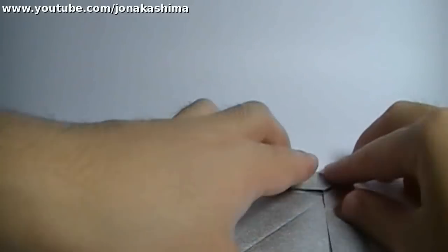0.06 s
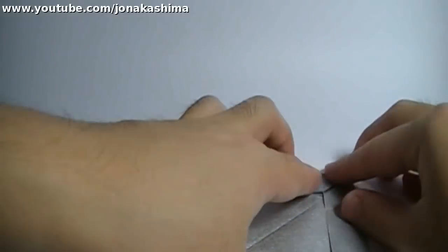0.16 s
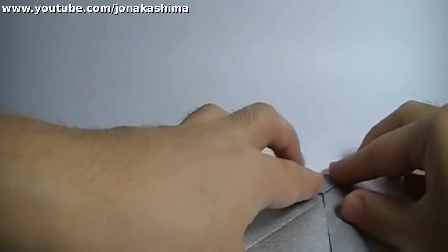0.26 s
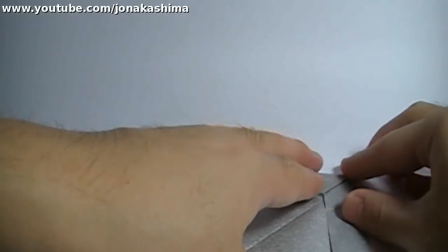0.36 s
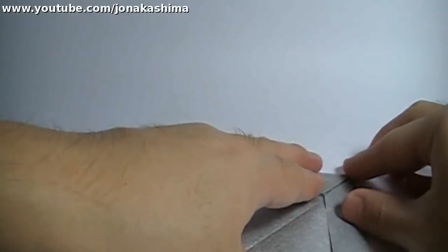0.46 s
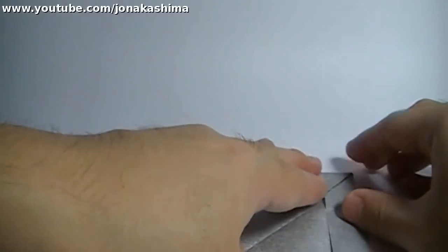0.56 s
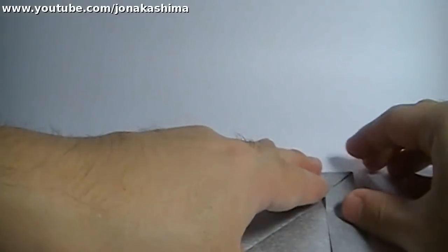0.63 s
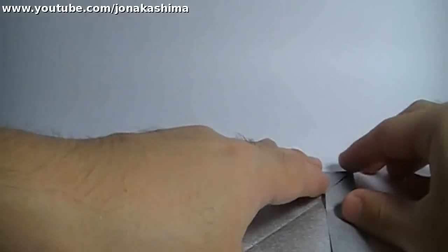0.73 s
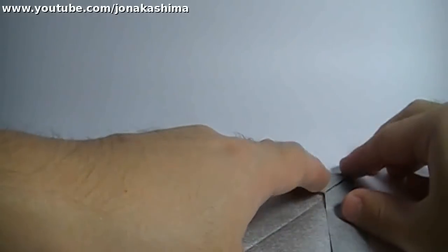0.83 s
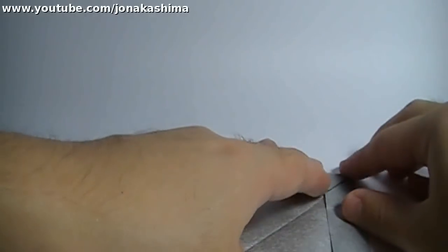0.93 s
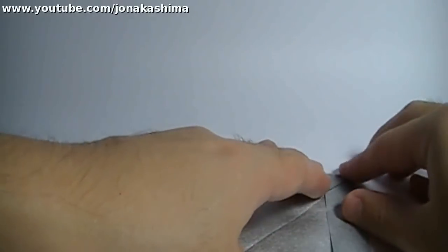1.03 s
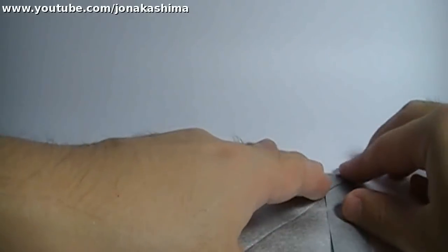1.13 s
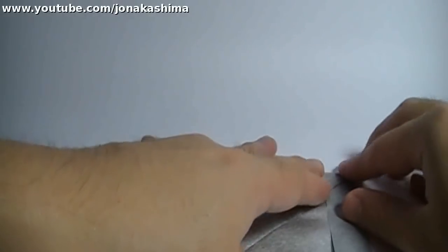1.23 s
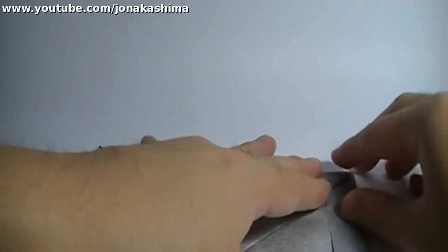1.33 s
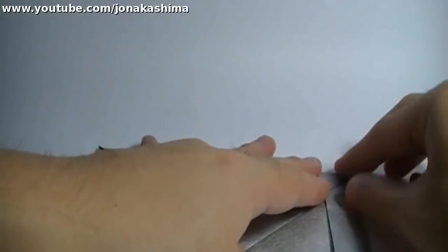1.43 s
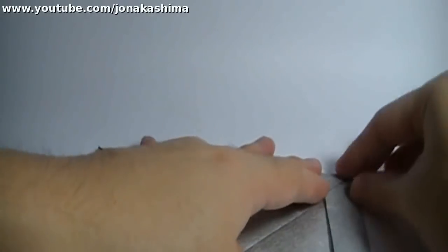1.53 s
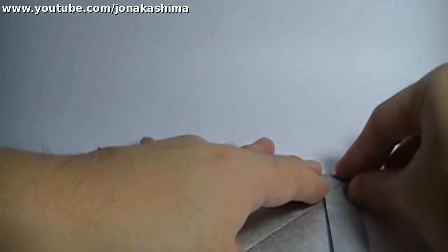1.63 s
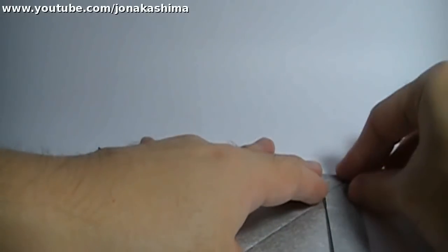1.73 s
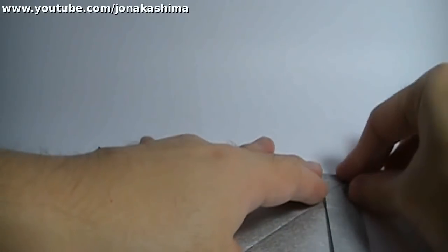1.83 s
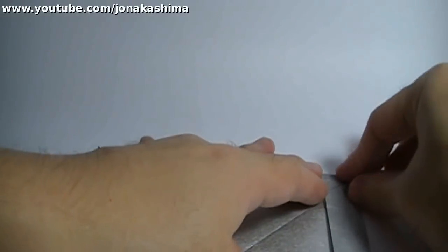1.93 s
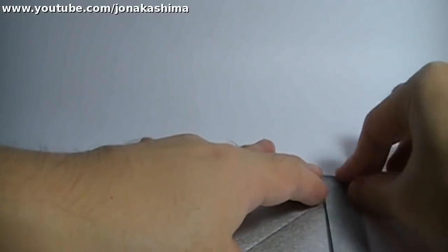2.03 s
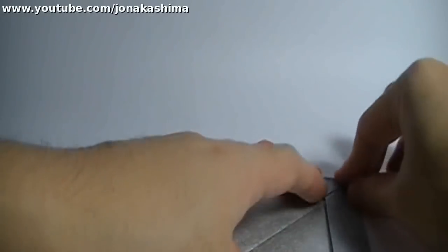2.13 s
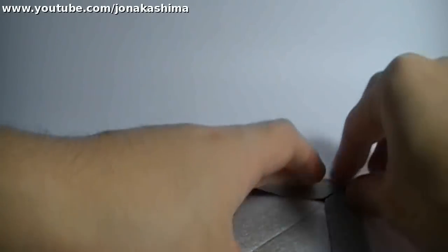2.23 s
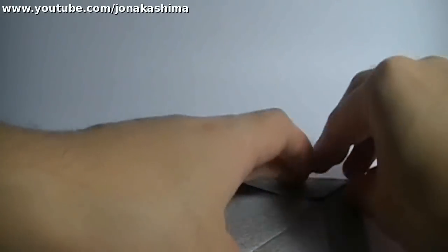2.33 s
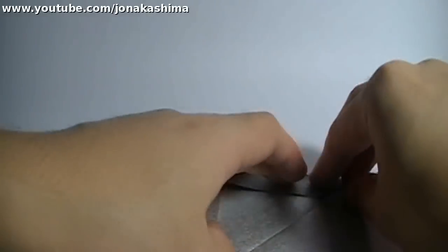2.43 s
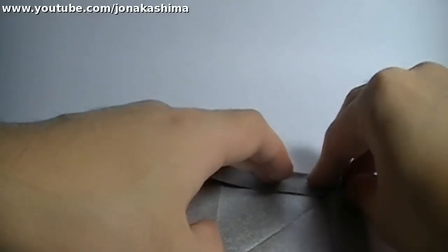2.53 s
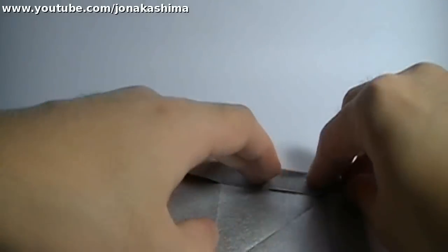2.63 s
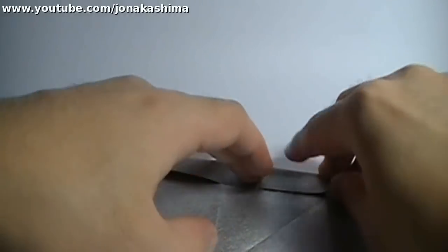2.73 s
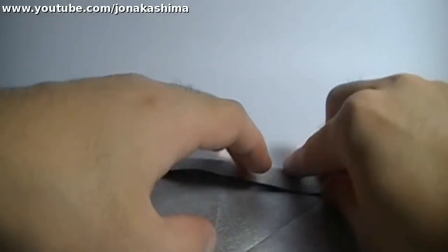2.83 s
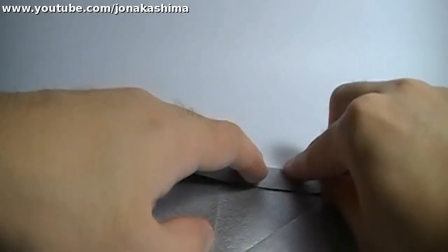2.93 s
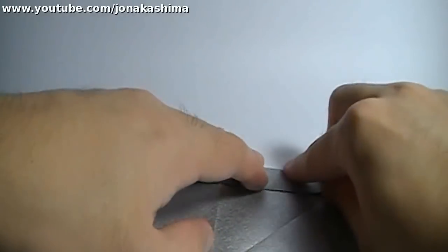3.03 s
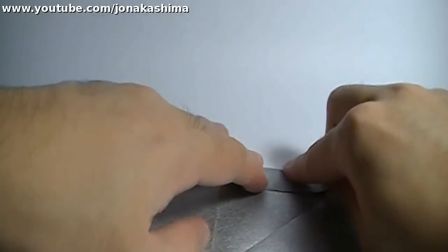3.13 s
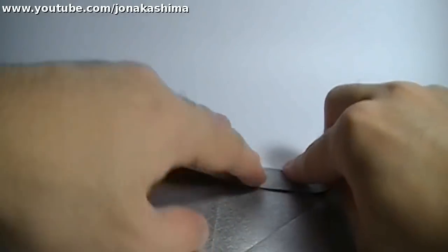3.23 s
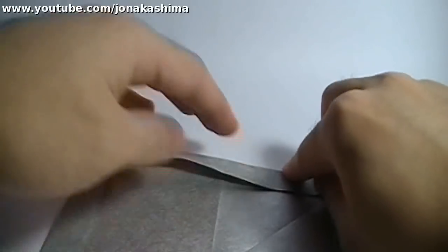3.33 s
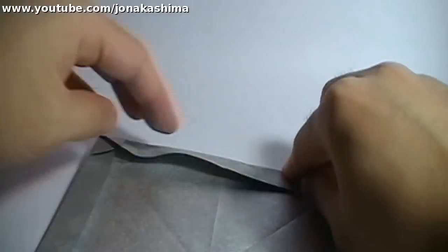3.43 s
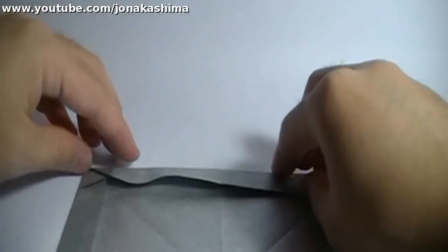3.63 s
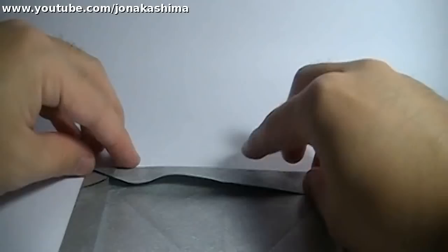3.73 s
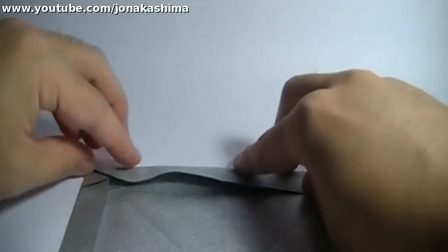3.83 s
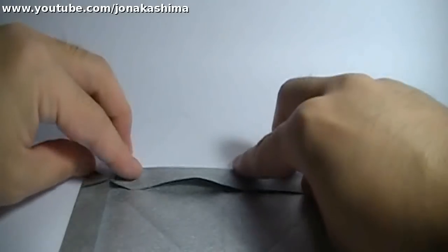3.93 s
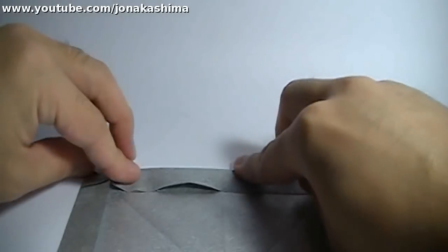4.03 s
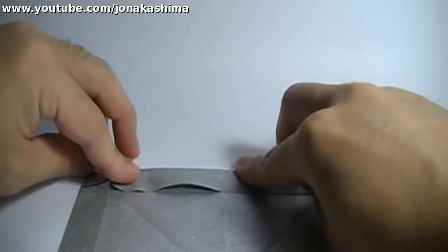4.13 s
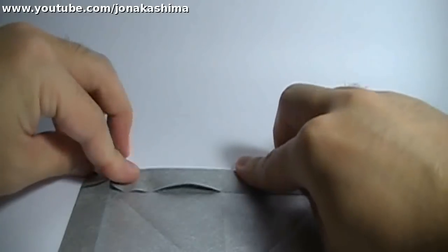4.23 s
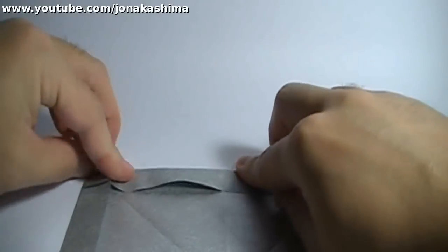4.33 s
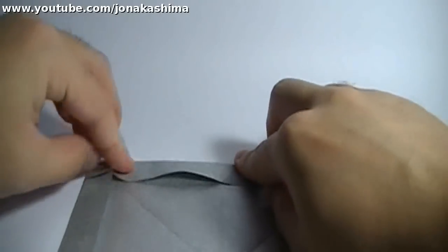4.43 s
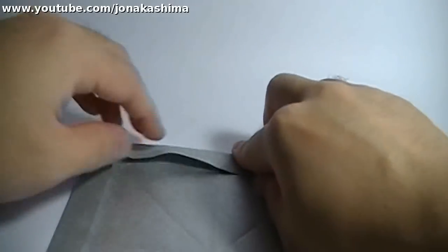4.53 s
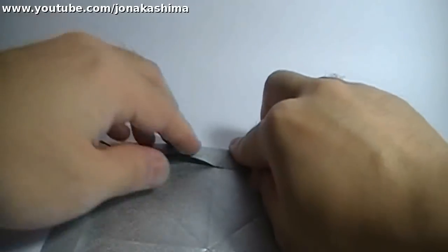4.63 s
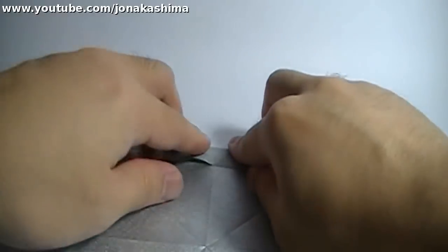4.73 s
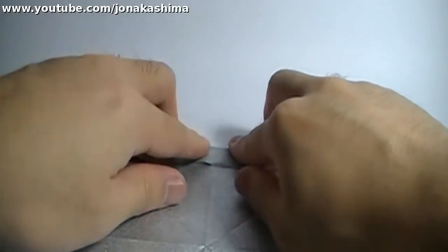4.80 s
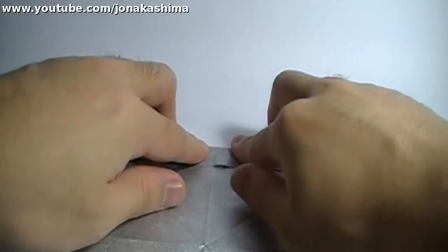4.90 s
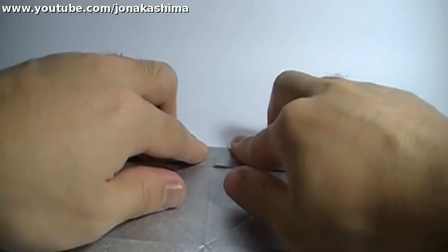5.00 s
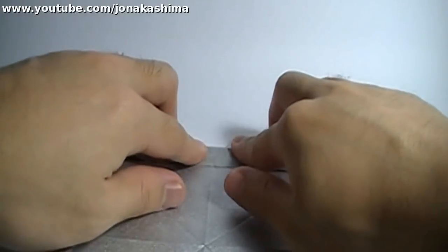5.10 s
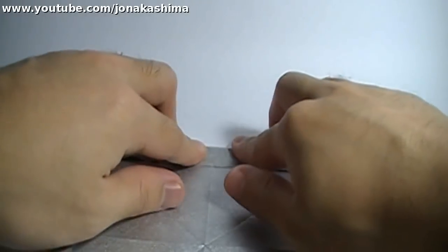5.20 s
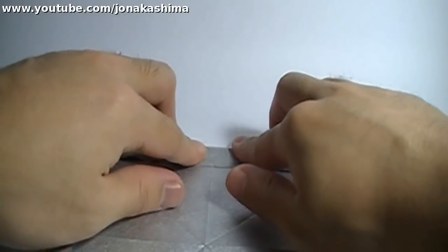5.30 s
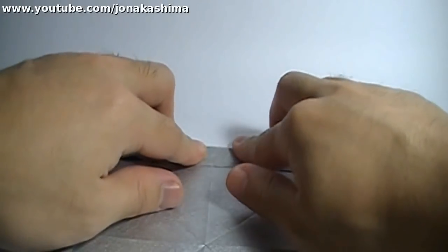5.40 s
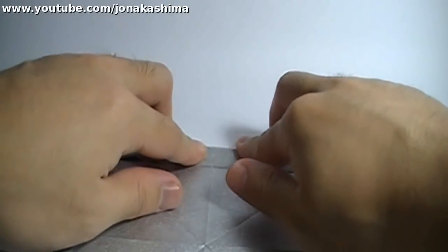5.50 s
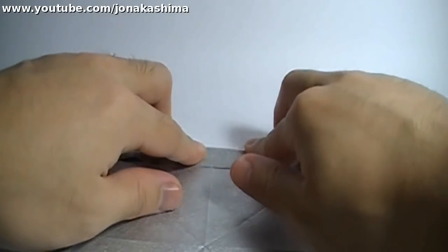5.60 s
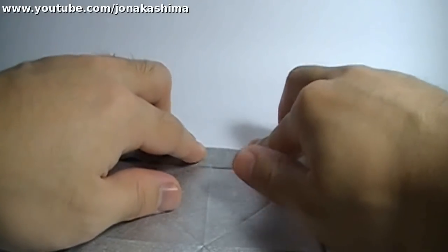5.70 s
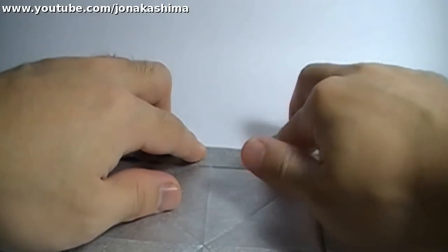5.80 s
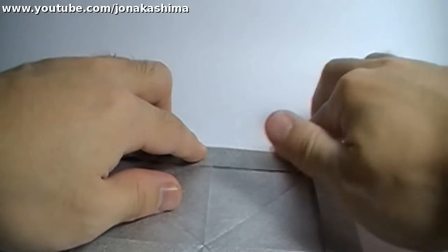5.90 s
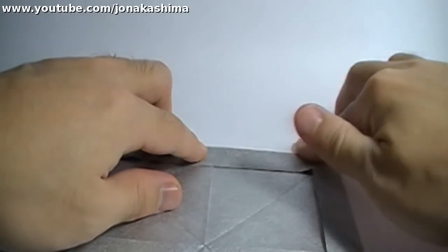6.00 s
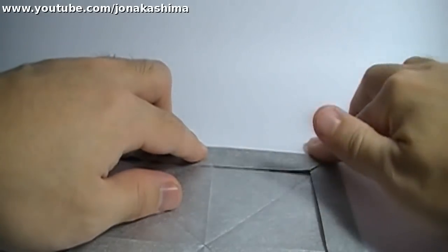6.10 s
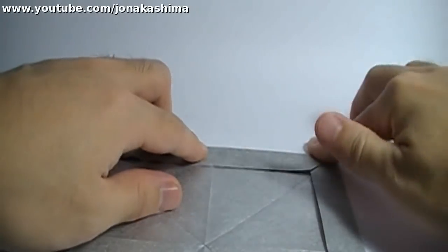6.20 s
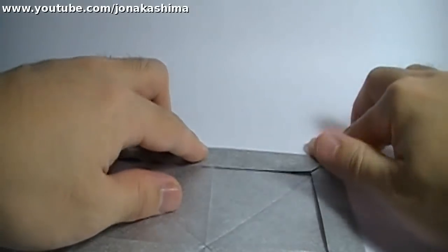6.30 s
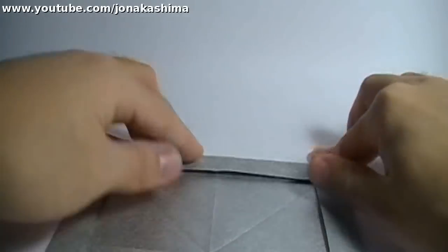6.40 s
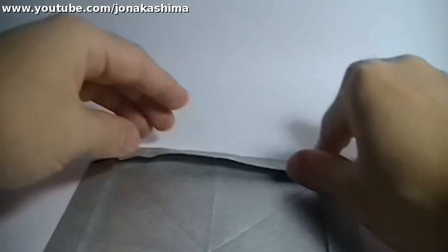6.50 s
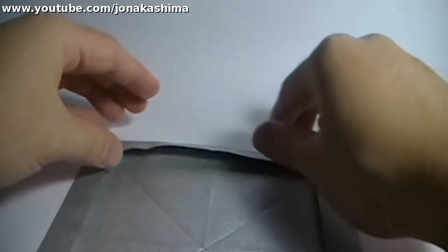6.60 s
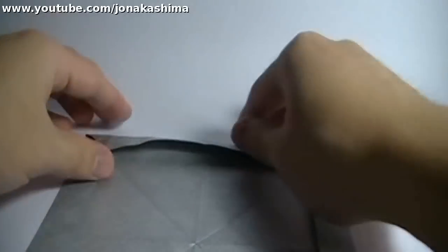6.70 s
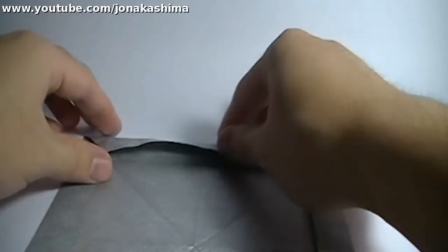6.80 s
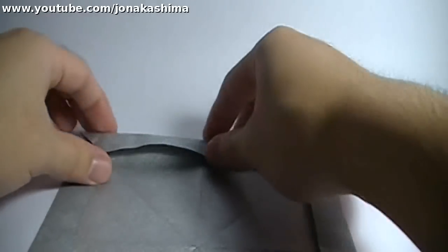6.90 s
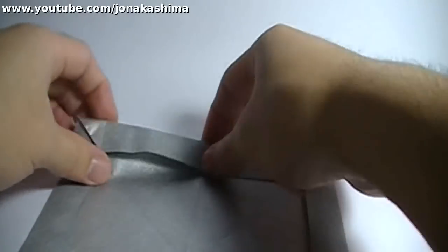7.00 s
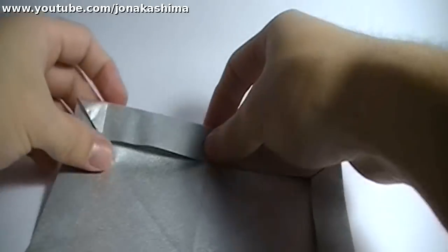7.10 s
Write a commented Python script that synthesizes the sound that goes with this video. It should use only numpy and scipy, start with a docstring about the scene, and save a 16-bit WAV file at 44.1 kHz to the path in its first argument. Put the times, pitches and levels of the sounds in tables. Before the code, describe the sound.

Close, quiet rustling of foil paper being creased by fingers, with scattered crackles, dull table taps and a loud crack near the end.

```python
"""Foil paper is folded by two hands on a table in a small room, close to a stereo microphone.
Short rubbing strokes and one long sweep are coloured noise of tiny slips, brighter when faster.
The foil buckles in sharp snaps and small crinkles: noise cracks with ragged flutters.
Fingertips land with soft low thumps, and knocks ring the table top as decaying sines.
A short room tail follows; a faint hum and steady hiss lie in the background."""
import sys
import numpy as np
from scipy import signal
from scipy.fft import rfft, irfft, next_fast_len
from scipy.io import wavfile

SR = 44100
rng = np.random.default_rng(int(sys.argv[2]) if len(sys.argv) > 2 else 0)


def wav_record(signal):
    """Record a signal, one row per channel, as 16-bit PCM in the file named by sys.argv[1]."""
    frames = np.transpose(np.atleast_2d(signal))
    bounded = np.clip(frames, -1, 1)
    # unit amplitude maps onto the largest positive 16-bit level
    quanta = np.round(bounded * 32767).astype(np.int16)
    wavfile.write(sys.argv[1], SR, quanta)


N = 315315
TIME = np.arange(N) / SR

# shorter rubbing strokes; sharpness is low for a flat finger pad, high for a nail on the edge:
# (start [s], rise [s], fall [s], hiss drive at the crest [dB], contact sharpness [dB])
RUBBING_STROKES = [(0.0, 0.01, 0.13, -49, 4), (.204, 0.077, 0.009, -42, 3.5), (.309, 0.013, 0.071, -46, 6),
                   (0.481, 0.029, 0.038, -47, 0.5), (0.624, 0.0036, 0.0082, -50.5, 0),
                   (1.385, 0.013, 0.021, -49.5, 8.5), (1.528, 0.019, 0.028, -52.5, -14),
                   (1.972, 0.019, 0.019, -54.5, -17), (2.193, 0.015, 0.043, -54.5, -17),
                   (2.249, 0.0049, 0.0095, -31, 2.5), (2.328, 0.18, 0.045, -46.5, -3),
                   (2.558, 0.13, 0.11, -46.5, -1.5), (2.824, 0.026, 0.012, -37.5, -1.5),
                   (3.201, 0.0079, 0.0045, -49, -3), (3.241, 0.0045, 0.033, -43, 7),
                   (3.448, 0.027, 0.034, -36.5, 3), (3.555, 0.063, 0.016, -29.5, 9),
                   (3.675, 0.053, 0.0075, -40, -4), (3.749, 0.028, 0.065, -56.5, -23),
                   (3.918, 0.033, 0.043, -52.5, -12), (4.76, 0.017, 0.047, -48, 1),
                   (4.865, 0.015, 0.1, -55, -7), (5.438, .005, .012, -57, -5),
                   (5.491, 0.079, 0.062, -54.5, 5.5), (5.651, 0.0068, 0.042, -46.5, 15),
                   (5.717, 0.0072, 0.052, -46, 3), (5.828, 0.11, 0.17, -45.5, 3),
                   (6.338, 0.075, 0.016, -48, 3), (6.44, 0.078, 0.025, -48, 3),
                   (6.673, 0.03, 0.021, -37, 1.5), (6.731, .11, 0.079, -43.5, -1.5),
                   (6.898, 0.089, 0.015, -38.5, -1), (7.029, 0.02, 0.12, -42.5, -8)]
# the long sweep along the fold, its speed given as hiss drive: (time [s], level [dB])
FOLD_SWEEP = [(4.08, -68), (4.092, -67), (4.28, -52.5), (4.288, -46.5), (4.354, -48), (4.368, -32.5),
              (4.472, -26), (4.614, -42.5), (4.622, -36.5), (4.76, -59.5)]
# the foil buckles; brightness is the step from one part of the sheet to the next smaller:
# (time [s], level [dB], brightness [dB], share of energy in the first crack [0-1])
FOIL_SNAPS = [(.0945, -48.5, -26, 0.07), (.1413, -43, 6, 0.33), (.7485, -31, 13, 0.1),
              (1.0209, -44, -6.5, 0.25), (1.1827, -44, -4.5, 0), (1.1885, -43.5, -8.5, 0.64),
              (1.2918, -46, 9.5, 0.3), (1.4378, -39, 9.5, 0.4), (1.5359, -43.5, 7, 0.7),
              (1.9768, -45, 4.5, 0.6), (2.1077, -51, -1, .15), (2.412, -34.5, 7, 0.07),
              (2.7072, -34.5, 29, 0.33), (2.7866, -45, -7, 0.02), (2.9281, -40.5, 4, 0.14),
              (3.1076, -32.5, 3.5, 0.08), (3.2435, -37, 2.5, 0.37), (3.454, -47, 10, .75),
              (3.4932, -38.5, 6, 0.08), (3.6249, -35, 0, 0.5), (3.9192, -42.5, 3.5, 0.1),
              (3.9527, -38.5, 5, 0.04), (3.9775, -44, 12, .02), (4.034, -48.5, 13, 0.2),
              (4.2886, -38, 4, 0.3), (4.702, -45.5, -4, 0), (4.8263, -28, 1.5, 0.28),
              (4.8744, -39, 2.5, 0.2), (5.4913, -42.5, 1.5, 0.02), (5.6546, -37.5, 3, 0.04),
              (6.3861, -32, 8.5, 0.03), (6.4493, -37.5, 4, 0.04), (6.4949, -43, -1.5, 0.08),
              (6.9179, -35, -8, 0.18), (6.99, -19, 7, 0.88), (7.0532, -32, 5, 0.7),
              (7.1275, -34.5, -3, 0.6)]
# resonances of the sheet, a negative boost being a dip: (frequency [Hz], width [Hz], boost [dB])
SHEET_RESONANCES = [(785, 60, 1.5), (1271, 16, 6.5), (1810, 460, 2), (4760, 210, 2.5), (7220, 890, -2)]
# how much the resting fingers shift, less while the fold is held down: (time [s], share [0-1])
FINGER_UNREST = [(5.0, 0.83), (5.12, .6), (5.42, 0.48), (5.5, 0.92)]
# firm presses of a fingertip on the table: (time [s], level of the push [dB])
FINGER_PRESSES = [(.072, -48), (1.548, -48.5), (1.973, -50.5), (2.523, -50.5), (2.707, -51), (3.099, -48.5),
                  (4.287, -46.5), (4.357, -44), (4.825, -46.5), (4.9, -50), (5.491, -41.5), (5.653, -46.5),
                  (5.722, -46.5), (5.823, -49.5), (6.384, -42.5), (6.821, -48.5)]
# touches that ring the table top: (time [s], drive level [dB], contact hardness [Hz])
TABLE_KNOCKS = [(.002, -53.5, 570), (0.494, -45, 450), (.749, -43, 730), (1.19, -44, 800),
                (2.786, -43, 616), (3.107, -51, 695), (3.494, -47.5, 604), (4.289, -44, 760),
                (4.962, -48, 550), (5.723, -49.5, 545), (6.083, -47, 683), (6.496, -46, 656)]
# modes of the table top before the hands damp it: (frequency [Hz], relative level [dB], t60 [s])
TABLE_TOP_MODES = [(431, -2, 0.27), (538.4, 3.5, 0.2), (678, 6, 0.13), (837, 9.5, 0.03), (1070, -20, .07)]
# spectra of foil hiss, sheet rustle, hand rumble and background: (frequency [Hz], relative level [dB])
FOIL_HISS_SPECTRUM = [(1200, -38.5), (2500, -12.5), (4000, -5.5), (5500, -3), (7000, 3), (8500, 1),
                      (10000, -10), (12500, -51), (15500, -47)]
SHEET_RUSTLE_SPECTRUM = [(120, -33), (300, -16.5), (550, 0), (900, -1.5), (1600, 0.5), (2400, 0.5),
                         (4000, -6), (8000, -44)]
HAND_RUMBLE_SPECTRUM = [(25, 0), (70, -18), (170, 13.5), (250, -17), (430, -1), (900, -27.5)]
BACKGROUND_SPECTRUM = [(25, -18), (60, -10.5), (105, -4), (220, -14.5), (450, -19.5), (1000, -20),
                       (4000, -26), (8000, -41.5), (13500, -28), (15000, -51)]
# stereo width of the table scene and of the background: (frequency [Hz], side re mid [dB])
TABLE_WIDTH = [(60, -33), (300, -17), (700, -13), (1300, -15), (2400, -31), (4400, -25), (6500, -19),
               (8200, -5.5), (15000, -2.5)]
BACKGROUND_WIDTH = [(60, -9.5), (300, 12.5), (1000, 7), (12000, -3.5)]

SWELL_DB, FADE_DB = 7, 8   # a stroke starts and ends this far under its crest
# a faster rub is brighter: drive at the usual speed, and dB gained for each dB of hiss
USUAL_HISS_DB = -41.5
RUSTLE_DB, RUSTLE_GROWTH = -52, 0.72
SIZZLE_DB, SIZZLE_GROWTH = -58, 1
RUSTLE_LOSS = 0.36   # dB of rustle lost for each dB of sharpness
FLAP_DB = -1.5   # the folded flap, re the dB mean of whole sheet and foil skin
SNAP_SPAN_S = 0.01   # span over which the rms of a snap is set
# every short stroke begins with a fingertip landing softly
LANDING_DB, LANDING_LAG_S = -57.5, 0.00602
FLOOR_DB = -62.5   # background hiss, rms of the mid
HUM_HZ, HUM_DB = 101.5, -72.5   # HUM_DB is the rms about which the hum wavers
CUTOFF_HZ = 15900


def from_db(db):
    """Decibels to gain."""
    return 10 ** (np.asarray(db) / 20)


def rms_one(x):
    """Scale to rms 1."""
    return x / np.sqrt(np.mean(x ** 2) + 1e-20)


def energy_one(x):
    """Scale to a total energy of 1."""
    return x / np.sqrt(np.sum(x ** 2) + 1e-20)


def add(track, s, sound):
    """Mix a short sound into a track at s seconds."""
    at = int(np.clip(round(s * SR), 0, N - 1))
    track[at:at + len(sound)] += sound[:N - at]


def colour(x, points):
    """Filter a sound by a curve of (frequency [Hz], level [dB]) points."""
    hz, level_db = np.transpose(points)
    size = next_fast_len(len(x))
    bins = np.maximum(np.fft.rfftfreq(size, 1 / SR), 1)
    gain = from_db(np.interp(np.log(bins), np.log(hz), level_db))
    return irfft(rfft(x, size) * gain, size)[:len(x)]


def band(x, low_hz, high_hz, order=2):
    """Causal band-pass."""
    edges = [low_hz, min(high_hz, SR / 2 - 1)]
    return signal.sosfilt(signal.butter(order, edges, "band", fs=SR, output="sos"), x)


def drift(rate):
    """A random wander of rms 1, joined by straight lines between `rate` new values a second."""
    knots = rng.standard_normal(N // 20)
    return rms_one(np.interp(TIME * rate, np.arange(len(knots)), knots))


def dying_noise(decay_s, size=4096):
    """A burst of noise that falls by 1/e in decay_s."""
    return rng.standard_normal(size) * np.exp(-TIME[:size] / decay_s)


def stroke_speed(grip_s=0.0016, release_s=0.0053):
    """Strokes grip, swell to a crest and let go, beside the sweep: hiss drive, and sharpness in dB."""
    sweep_s, sweep_db = np.transpose(FOLD_SWEEP)
    sweeping = (TIME > sweep_s[0]) & (TIME < sweep_s[-1])
    speed = from_db(np.interp(TIME, sweep_s, sweep_db)) * sweeping
    weighted_sharpness = np.zeros(N)
    t = TIME[:SR]
    for start, rise_s, fall_s, crest_db, sharp_db in RUBBING_STROKES:
        marks = np.cumsum([0, abs(rise_s), abs(fall_s)])
        grip = np.clip(t / grip_s, 0, 1)
        release = np.exp(-np.clip((t - marks[-1]) / release_s, 0, 20))
        under_crest_db = np.interp(t, marks, [SWELL_DB, 0, FADE_DB])
        stroke = grip * release * from_db(crest_db - under_crest_db)
        add(speed, start, stroke)
        add(weighted_sharpness, start, stroke * sharp_db)
    return speed, weighted_sharpness / (speed + 1e-9)


def friction(per_s, spread_db, smooth):
    """Countless tiny slips of uneven size over a smooth hiss."""
    slips = (rng.random(N) < per_s / SR) * rng.choice([-1, 1], N)
    sizes = from_db(spread_db * np.minimum(rng.exponential(1, N), 4))
    return rms_one(rms_one(slips * sizes) + smooth * rng.standard_normal(N))


def under_hand(x, path_s=0.000875, sway=0.277):
    """A moving hand reflects a little sound from close by, so shallow peaks wander through it."""
    lag = SR * path_s * np.exp(sway * drift(9))   # samples
    reflection = np.interp(np.arange(N) - lag, np.arange(N), x)
    return x + 0.32 * reflection


def rubbing(hiss, body, sizzle, rumble_gain_db=-42, rumble_growth=0.36):
    """The foil hisses and sizzles at its edge, the sheet rustles and the hand rumbles on the table."""
    foil_slips = friction(per_s=2200, spread_db=3.6, smooth=0.85)
    foil_hiss = hiss * rms_one(colour(foil_slips, FOIL_HISS_SPECTRUM))
    edge_sizzle = sizzle * rms_one(band(foil_slips, 9150, 12240))
    skin = under_hand(foil_hiss + edge_sizzle)
    sheet_slips = friction(per_s=1000, spread_db=2.5, smooth=0.88)
    rustle = rms_one(colour(sheet_slips, SHEET_RUSTLE_SPECTRUM))
    sheet = body * under_hand(rustle, path_s=0.001723)
    # the rumble grows more slowly than the rustle
    rumble_strength = body ** rumble_growth * from_db(rumble_gain_db)
    rumble = rumble_strength * rms_one(colour(rng.standard_normal(N), HAND_RUMBLE_SPECTRUM))
    return skin + sheet + rumble


def crinkles(speed, per_s=22, level_db=-54, spread_db=5, bright_db=2, bright_spread_db=10,
             share=0.3, growth=0.65):
    """Small creases give way at random, louder under a fast finger; rows like those of FOIL_SNAPS."""
    place, size, tint = rng.random((400, 3))[:int(per_s * N / SR)].T
    s = place * N / SR
    pace_db = 20 * np.log10(np.interp(s, TIME, speed) + 1e-9) - USUAL_HISS_DB
    levels_db = level_db + growth * pace_db + spread_db * (2 * size - 1)
    brights_db = bright_db + bright_spread_db * (2 * tint - 1)
    return np.transpose([s, levels_db, brights_db, np.full(len(s), share)])


def ragged(burst, lump_s=0.001063, lump_db=4):
    """Neighbouring creases give way one after another, so a burst comes in uneven lumps."""
    lumps = rng.standard_normal(len(burst))
    lump_curve = np.interp(TIME[:len(burst)] / lump_s, np.arange(len(lumps)), lumps)
    return burst * from_db(lump_db * lump_curve)


def snaps(buckles, crack_s=0.00073):
    """A buckle is a sharp crack and a flutter, which dies sooner in small stiff parts than in the sheet."""
    out = np.zeros(N)
    for s, level_db, bright_db, share in buckles:
        share = np.clip(share, 0, 1)
        balance = energy_one(from_db([-bright_db, FLAP_DB, bright_db]))
        sheet, flap, skin = from_db(level_db) * balance
        # strength, band edges, flutter decay [s]
        parts = [(sheet, dict(low_hz=360, high_hz=1380), 0.0075),
                 (flap, dict(low_hz=1340, high_hz=4470), 0.0055),
                 (skin, dict(low_hz=5340, high_hz=8670), 0.0052)]
        for strength, edges, flutter_s in parts:
            crack = energy_one(band(dying_noise(crack_s), **edges))
            flutter = energy_one(band(ragged(dying_noise(flutter_s)), **edges))
            buckle = energy_one(np.sqrt(share) * crack + np.sqrt(1 - share) * flutter)
            add(out, s, strength * np.sqrt(SNAP_SPAN_S * SR) * buckle)
    return out


def fidgeting(whisper_db=-67.5, bumps_db=-65, bumps_per_s=70, bump_s=0.012, spread_db=3):
    """Resting fingers shift a little: a foil whisper and dull bumps, softer while the fold is held down."""
    unrest = np.interp(TIME, *np.transpose(FINGER_UNREST))   # scales both levels
    whisper_noise = rms_one(colour(rng.standard_normal(N), FOIL_HISS_SPECTRUM))
    whisper = from_db(whisper_db + 3.8 * drift(45)) * whisper_noise
    touches = (rng.random(N) < bumps_per_s / SR) * from_db(spread_db * rng.standard_normal(N))
    # each touch decays by 1/e in bump_s
    fading = signal.lfilter([1], [1, -np.exp(-1 / (bump_s * SR))], touches + 1e-18)
    bumps = from_db(bumps_db) * rms_one(band(fading * rng.standard_normal(N), 310, 790))
    return unrest * (whisper + bumps)


def sheet_ring(x):
    """The sheet on the table colours the sound with a few resonances."""
    for hz, width_hz, boost_db in SHEET_RESONANCES:
        resonance = signal.lfilter(*signal.iirpeak(hz, hz / width_hz, fs=SR), x)
        x = x + (from_db(boost_db) - 1) * resonance
    return x


def thumps(decay_s=0.019, span_s=0.024, pat_db=-9):
    """A soft fingertip gives the table a dull push with a little pat on top."""
    out = np.zeros(N)
    landings = [(start + LANDING_LAG_S, LANDING_DB) for start, *_ in RUBBING_STROKES]
    for s, level_db in [*FINGER_PRESSES, *landings]:
        push = energy_one(band(dying_noise(decay_s), 74, 177))
        pat = energy_one(band(dying_noise(decay_s), 300, 730))
        strength = from_db(level_db) * np.sqrt(span_s * SR)   # push level is its rms over span_s
        add(out, s, strength * (push + from_db(pat_db) * pat))
    return out


def knocks(reach=0.17, damping=0.47):
    """A firmer touch rings the modes that suit the contact; the resting hands damp them unevenly."""
    out, t = np.zeros(N), TIME[:SR // 2]
    for s, level_db, contact_hz in TABLE_KNOCKS:
        for k, (hz, mode_db, t60) in enumerate(TABLE_TOP_MODES):
            match = 1 / (1 + (np.log(hz / contact_hz) / reach) ** 2)
            fall_db = 60 * t / t60 * (1 + damping * rng.random())
            strength = (-1) ** k * match * from_db(level_db + mode_db - fall_db)   # signs alternate
            add(out, s, strength * np.sin(2 * np.pi * hz * t))
    return out


def stereo(source, width, left_db=0.47):
    """A spread source: the mid both microphone ports share, and a side opposite in sign between them."""
    mid = source()
    side = colour(source(), width)
    return np.array([mid + side, mid - side]) * from_db([[left_db], [-left_db]])


def desk_echoes(x, echo_db=-13, decay_s=0.0029):
    """Table and wall send back a cluster of early reflections that gives the treble a fixed fine colour."""
    late_enough = TIME[:4096] > 0.002
    cluster = band(dying_noise(decay_s) * late_enough, 2500, 12000, order=1)
    echoes = signal.oaconvolve(x, energy_one(cluster)[None], axes=1)[:, :N]
    return (x + from_db(echo_db) * echoes) / np.hypot(1, from_db(echo_db))


def room(x, t60=0.1, room_db=-15, first_s=0.0092):
    """A small furnished room answers with a short, slightly dull tail, separate at each microphone port."""
    t = TIME[:SR // 2]
    noise = band(rng.standard_normal((2, len(t))), 60, 8500, order=1)
    tails = noise * from_db(-60 * t / t60) * (t > first_s)
    answers = [signal.oaconvolve(port, energy_one(tail))[:N] for port, tail in zip(x, tails)]
    return from_db(room_db) * np.array(answers)


def background():
    """Steady wide hiss and a low hum, a sine of slightly wavering level."""
    hiss = stereo(lambda: rms_one(colour(rng.standard_normal(N), BACKGROUND_SPECTRUM)), BACKGROUND_WIDTH)
    hum_level = from_db(HUM_DB + 1.3 * drift(6.7))
    hum = hum_level * np.sqrt(2) * np.sin(2 * np.pi * HUM_HZ * TIME)
    return from_db(FLOOR_DB) * hiss + hum


def scene(judder_db=0.5, waver_db=0.5, glide_db=-34):
    """Foil and table in the room; slow fingers stick and slip, fast ones glide."""
    speed, sharp_db = stroke_speed()
    sticking = 1 / (1 + speed / from_db(glide_db))
    hiss = speed * from_db(judder_db * drift(120) + sticking * waver_db * drift(45))
    pace = hiss / from_db(USUAL_HISS_DB)
    # a sharper contact rustles less and sizzles more
    body = from_db(RUSTLE_DB - RUSTLE_LOSS * sharp_db) * pace ** RUSTLE_GROWTH
    sizzle = from_db(SIZZLE_DB + sharp_db) * pace ** SIZZLE_GROWTH
    buckles = [*FOIL_SNAPS, *crinkles(speed)]

    def foil_source():
        """All sounds of the foil, coloured by the sheet's resonances."""
        return sheet_ring(rubbing(hiss, body, sizzle) + snaps(buckles) + fidgeting())

    foil = stereo(foil_source, TABLE_WIDTH)
    table = stereo(thumps, TABLE_WIDTH, left_db=1.9) + knocks()   # knocks sit in the middle
    near = desk_echoes(foil) + table
    return near + room(near) + background()


def record(dry):
    """Sharp peaks are softly rounded and the top is cut steeply."""
    rounded = np.tanh(dry)
    return signal.sosfilt(signal.ellip(10, 0.1, 80, CUTOFF_HZ, fs=SR, output="sos"), rounded)


dry = scene()
out = record(dry)
wav_record(out)
```